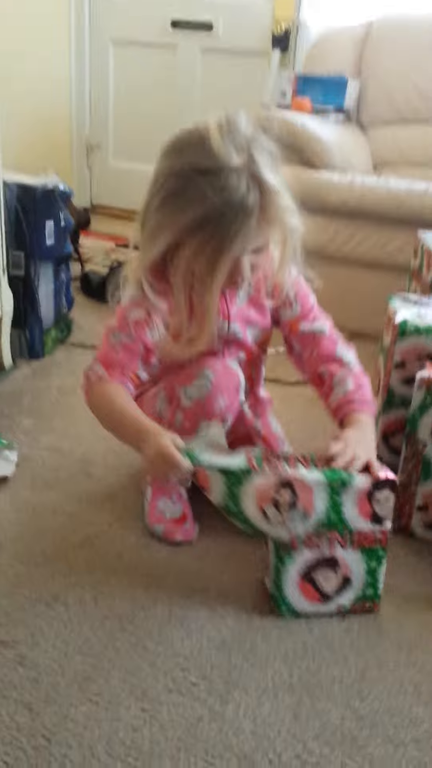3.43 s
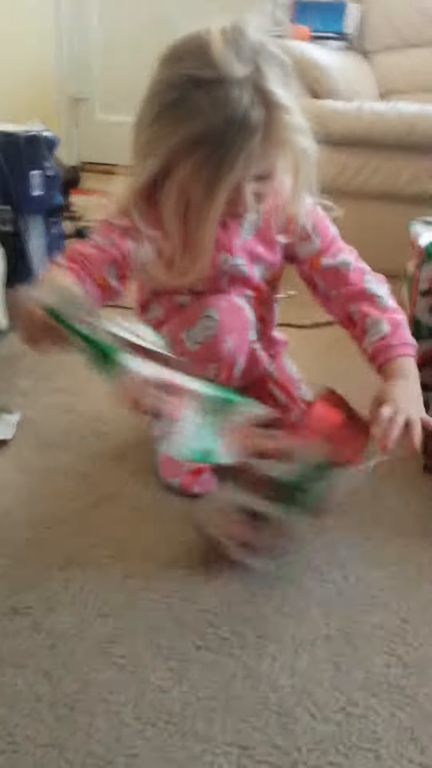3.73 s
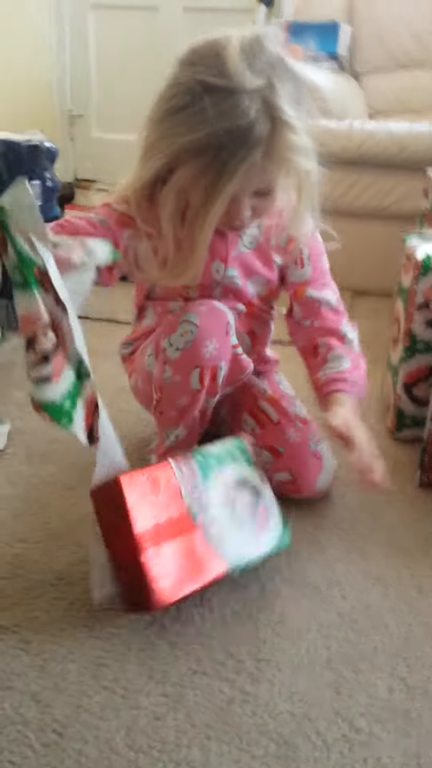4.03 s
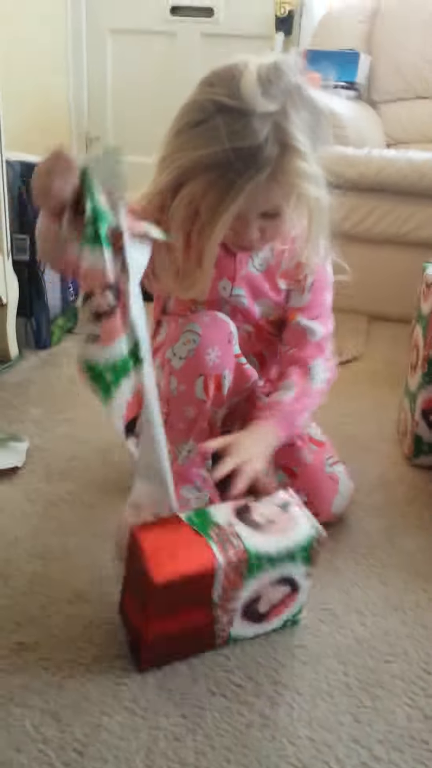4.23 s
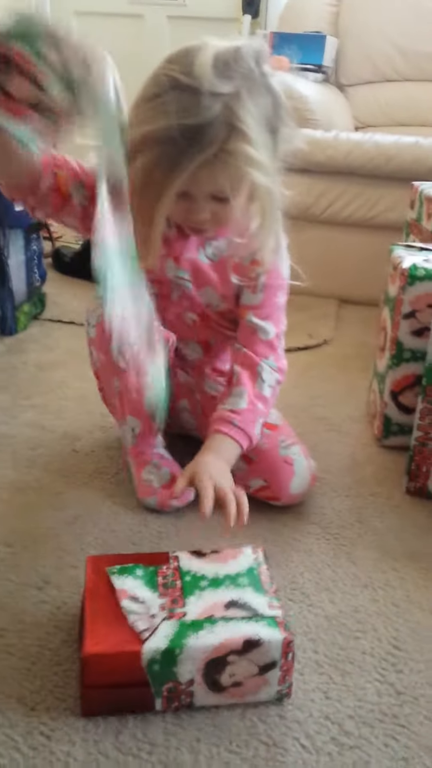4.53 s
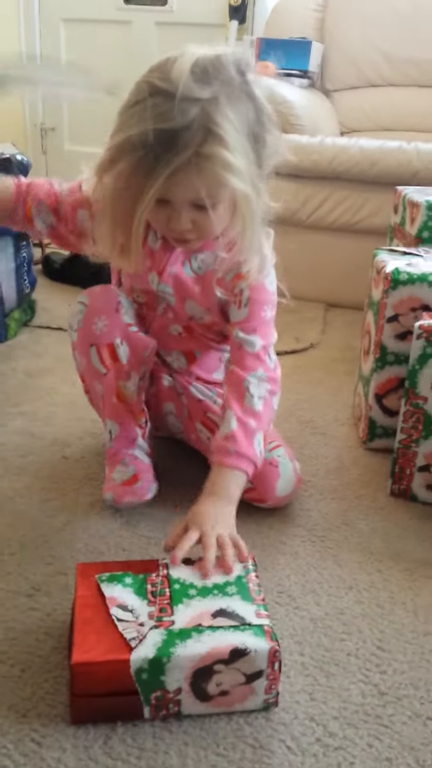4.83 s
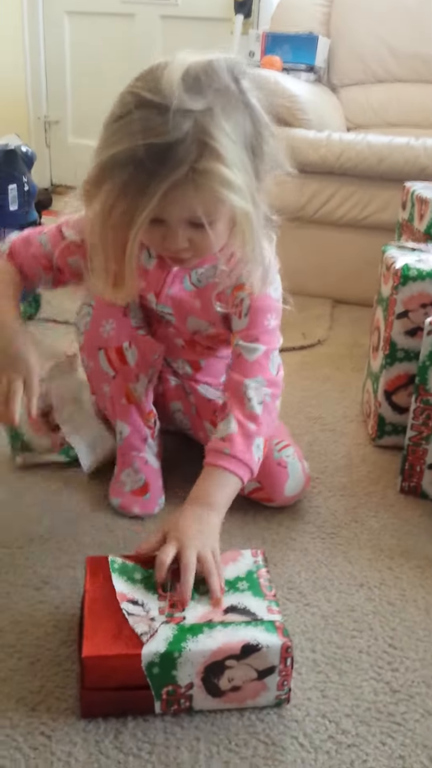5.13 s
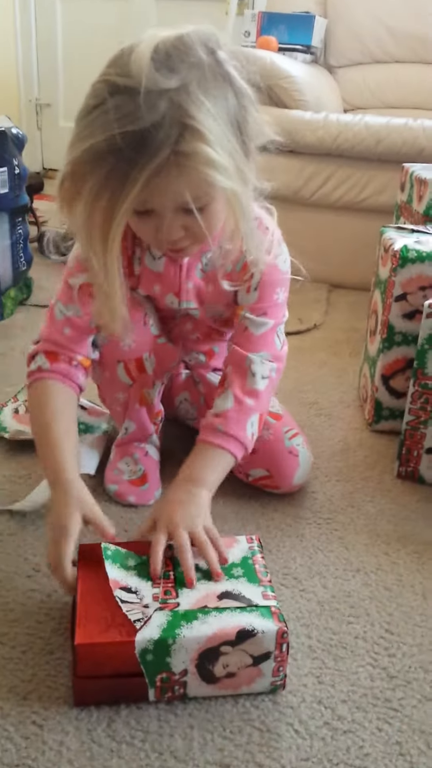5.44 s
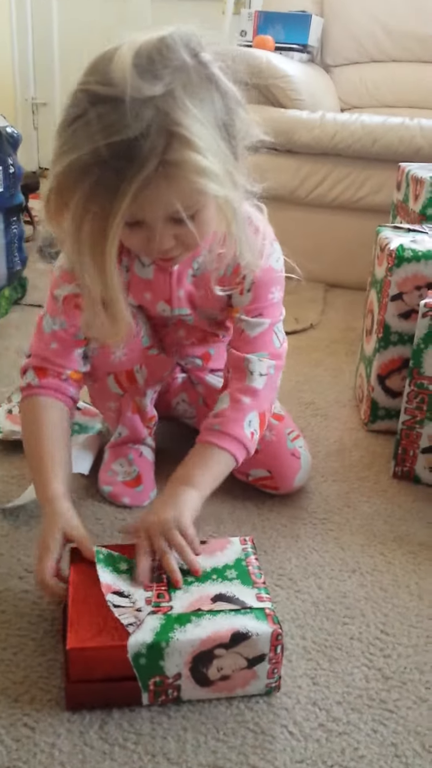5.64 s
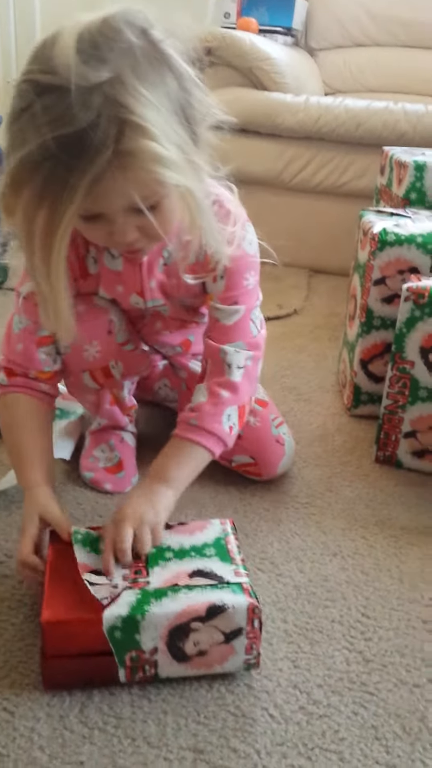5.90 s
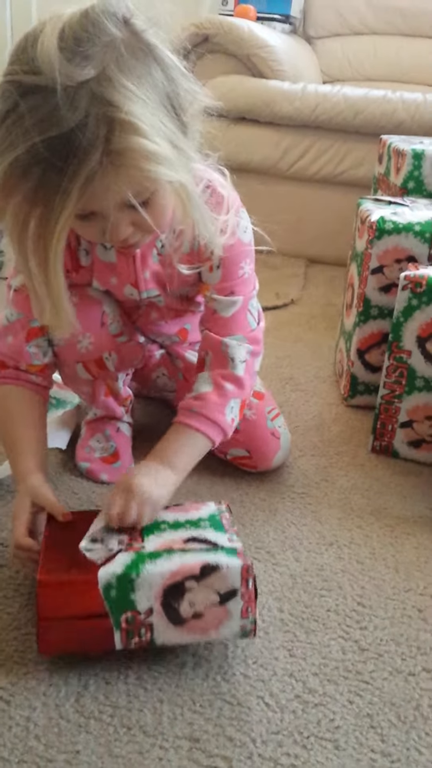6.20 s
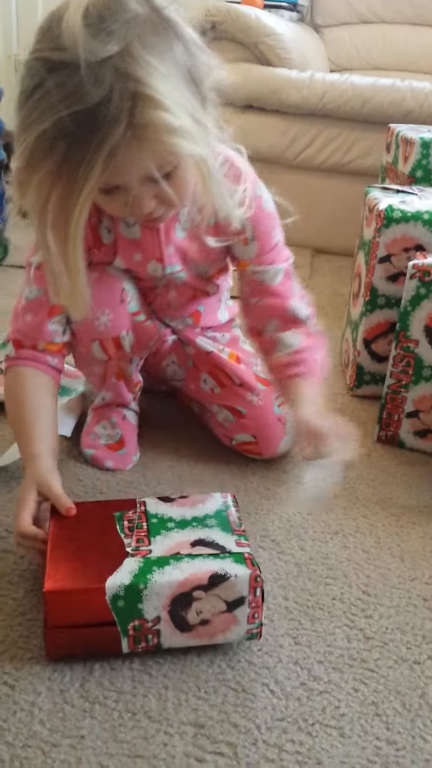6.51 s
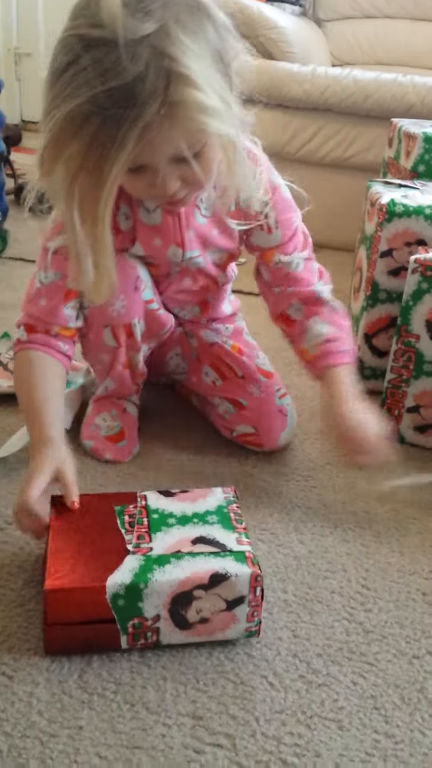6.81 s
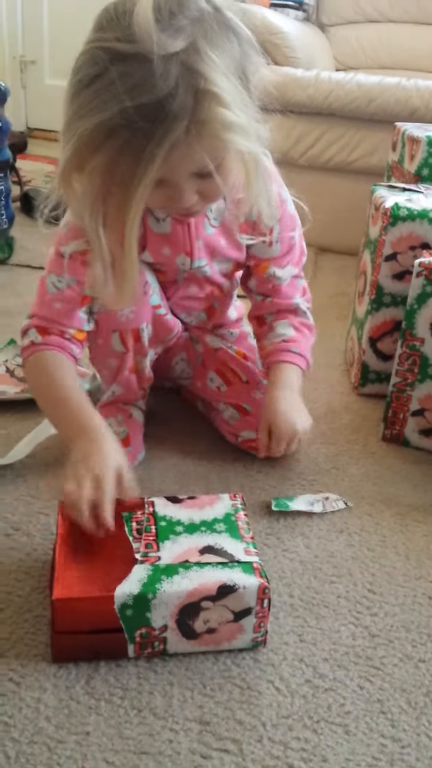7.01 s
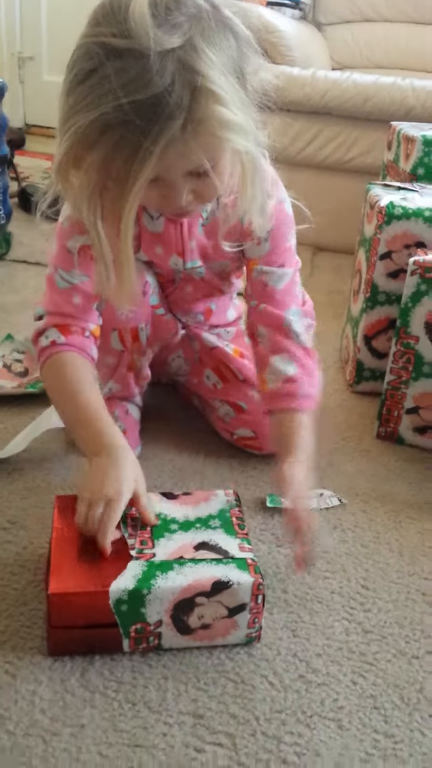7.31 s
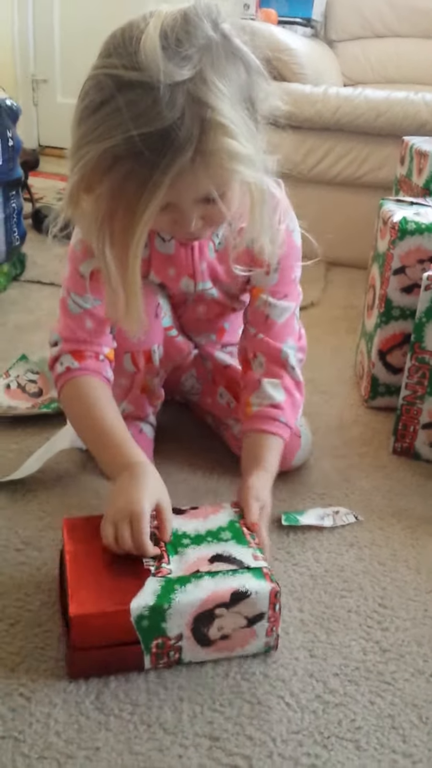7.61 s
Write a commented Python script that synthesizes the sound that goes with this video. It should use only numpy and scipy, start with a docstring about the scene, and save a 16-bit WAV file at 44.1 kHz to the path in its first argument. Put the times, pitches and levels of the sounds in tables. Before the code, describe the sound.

Hands rustle wrapping paper on a cardboard gift box, its creases snapping sharply, then tear it in a quick run of rips. After softer rustling comes a second, choppy run of rips with one dull pop on the right, then two more pulls. The box bumps lightly, the paper crinkles and rips once more, and faint handling follows. The sound is close, in a quiet living room with a faint appliance hum.

```python
'''A soft rustle of wrapping paper, dotted with snapping creases, as hands work at a box on a living-room carpet.
Then the paper rips, pull after pull: the edge gives with a snap, and a run of breaking fibres shakes
the sheet and drums the cardboard, swelling to a crest and easing off. Between pulls the rustle returns.
Hands knock the box, it tumbles over once, and one dull pop lands on the right.
The room answers with a short reverb over a faint appliance hum.'''
import sys
import numpy as np
from scipy import signal
from scipy.fft import rfft, irfft
from scipy.io import wavfile
from scipy.ndimage import uniform_filter1d

SR = 44100
rng = np.random.default_rng(int(sys.argv[2]) if len(sys.argv) > 2 else 0)


def waveform_to_disk(signal):
    """Save audio, clipped to [-1, 1], as 16-bit WAV at the path in sys.argv[1]."""
    frames = np.transpose(np.atleast_2d(signal))
    scaled = np.clip(frames, -1, 1) * 32767
    samples = np.round(scaled).astype(np.int16)
    wavfile.write(sys.argv[1], SR, samples)


N = 342216

# Cue levels are set ahead of each voice's trims. Boom, fizz and drum ride relative to the level;
# the crest sits at 0-1 of the move, and the sag is the drop away from it.
# tearing pulls: t/s, length/s, level/dB, crest, sag/dB, boom/dB, fizz/dB, box drum/dB, edge snap/dB
PULLS = [ (1.371, 0.084, -23.5, 1, 1.5, -7, -2, -16, -6.5),
         (1.455, 0.059, -15.5, 0.75, 3.5, -11, -3.5, -18.5, -13),
         (1.505, .168, -15.5, 0.3, 5, -13, -3.5, -24, 4),
         (1.887, .17, -20.5, 0.53, 4, -13.5, -4.5, -17, -0.5),
         (2.061, 0.073, -20, 0.6, 1.5, -11, -3, -17, -2), (3.184, .073, -16, 0.53, 8, -15, -5, -13, -3.5),
         (3.254, 0.14, -21, 0.03, 2.5, -14, -3, -16.5, -18),
         (3.41, 0.053, -19.5, 0.35, 1.5, -14, -0.5, -15.5, -3), (3.474, 0.033, -25, .1, 7, -14, 0, -8, 2),
         (3.603, 0.031, -20, .1, 16, -14.5, -9, -18, 0), (3.633, 0.049, -15.5, 0.4, 4, -21, -8, -17, -5),
         (3.683, 0.039, -20, 0.2, 4, -24, 0.5, -19, -7), (3.767, .060, -20.5, 1, 5, -14.5, -2.5, -23, -1),
         (3.826, 0.028, -17.5, 0.64, 4.5, -20, 3, -45, -10),
         (3.91, 0.065, -18, 0.8, 1, -14, -1.5, -26, -13),
         (4.306, 0.13, -20, 0.22, 8, -15.5, -5.5, -21.5, -8),
         (4.446, 0.13, -16.5, 0.05, 8.5, -17.5, -4, -20.5, 1.5),
         (6.316, 0.16, -21, .55, 4, -15.5, -1.5, -12, -6)]
# hand moves that rustle the paper: t/s, length/s, level/dB, crest, sag/dB, boom/dB, fizz/dB
HAND_MOVES = [ (0, 0.55, -44.5, .6, 3.5, -7.5, -4), (0.491, 0.25, -40, 0.33, -3, -7, -6.5),
              (0.715, .19, -29, 0.2, 3.5, -9, -4.5), (0.903, .15, -29, 0.6, 0.5, -11.5, -4.5),
              (1.051, 0.21, -22.5, 1, 6, -9.5, -4), (1.257, 0.074, -28, 0.56, 12, -9, -6),
              (1.335, .034, -24.5, 0, 1, -7.5, -15), (1.68, 0.19, -37.5, .3, 2, -8, -3.5),
              (1.855, 0.048, -24.5, .9, 3, -16.5, 0), (2.134, 0.069, -39, 0, 9, -5, 3),
              (2.23, 0.18, -44.5, 0.8, 6, -4.5, -6), (2.38, 0.19, -40.5, 0.5, 11, -4, -8),
              (2.558, 0.48, -45.5, 1, 8.5, -5.5, -4.5), (2.966, 0.17, -46, .6, -2, -5, -5),
              (3.12, 0.068, -25.5, .95, 10.5, -6.5, -9), (3.503, 0.12, -26.5, 0.8, 9.5, -10, -2.5),
              (3.859, 0.044, -28.5, 0.5, 2, -15, -14), (3.981, 0.34, -44, 0, 9, -4.5, -8),
              (4.279, .024, -27.5, .3, 4, -14, -8), (4.677, 0.26, -51, 1, 3, -6, -6),
              (4.89, .25, -43, 0.56, 6.5, -6.5, -6.5), (5.148, 0.074, -38.5, 0.1, 1, -6, 2),
              (5.223, .30, -47.5, .05, 3, -6, -6), (5.517, 0.38, -48.5, .25, 22, -7, -3),
              (5.897, 0.14, -46.5, 0.57, 14, -5, -4), (6.056, .12, -51, 0.9, 14, 1.5, 3),
              (6.175, .14, -25, .75, 7, -21.5, -4), (6.749, 0.063, -53, 0.8, 15, -16, -3),
              (6.827, 0.16, -51, 0.64, 11, -10, -3), (7.133, 0.29, -58.5, 0, 9, -1, -5),
              (7.445, 0.12, -39, 0.41, 25, -10, -8), (7.603, 0.15, -45.5, 1, 7, -7, 2.5)]
# large creases snapping through: t/s, level/dB, boom control/dB
CREASE_SNAPS = [(0.1399, -17.5, -40), (.2746, -18, -15), (0.5618, -11, -16), (.713, -1, -12),
                (.747, -8, -18), (.853, -7.5, -33), (0.9222, -10.5, -28), (0.9731, -0.5, -39),
                (1.051, -6, -30), (1.0847, -2, -30), (1.1173, -2, -19), (1.1266, -1, -9), (1.1763, -8, -28),
                (1.1903, -6, -26), (1.2103, -1, -39), (1.2418, -5, -24), (1.3385, -6, -19),
                (1.403, -1.5, -30), (1.4866, 1, -41), (1.8657, -5.5, -22), (2.1812, -14, -23),
                (2.2172, -18.5, -24), (2.3268, -20.5, -12), (2.7417, -24, -8), (2.766, -26, -30),
                (2.971, -14, -9), (3.057, -10.5, -4), (3.117, -9, -5), (3.145, -6, -8), (3.5538, -5, -44),
                (3.7553, -3, -15), (4.0482, -14.5, -2), (4.141, -15, -8), (4.2841, -12, -28),
                (4.8957, -20, -9), (5.0049, -12.5, -26), (5.079, -14.5, -30), (5.152, -13, -30),
                (5.1943, -13, -18), (6.0544, -17, -40), (6.0926, -13.5, -38), (6.148, -15, -21),
                (6.175, -6, -47), (6.2124, -10, -27), (6.2393, -1, -31), (6.2595, -8, -49),
                (6.275, -16, -42), (6.2957, -6.5, -38), (6.719, -33.5, 1), (7.5127, -19.5, -18),
                (7.6216, -24, -27), (7.668, -23, -26), (7.7094, -22.5, -30)]
# blows on the box and its taut wrapping: t/s, level/dB, favoured f/Hz
BOX_BLOWS = [(.714, -17.5, 2100), (0.721, -33, 324), (0.757, -33.5, 260), (1.047, -36, 220),
             (4.605, -31.5, 493), (4.616, -34, 66.5), (4.65, -51, 92), (4.733, -49, 460), (5.152, -38, 390),
             (5.33, -40, 367), (5.518, -34.5, 192), (5.575, -35, 327), (5.586, -35.5, 302),
             (5.967, -34, 403), (6.174, -31.5, 437), (7.136, -32.5, 320), (7.138, -45, 125),
             (7.496, -33.5, 367), (7.601, -41, 320)]
# modes of the wrapped cardboard box: nominal f/Hz, level/dB, t60/s
BOX_MODES = [(61.5, 3.5, 0.11), (119, 14, 0.14), (204.5, 3.5, 0.2), (312, -1, 0.077), (418.4, 3, 0.027),
             (466, -3.5, 0.13), (585, -6.5, 0.068), (910, -10.5, .04), (1230, -23, 0.0263),
             (1520, -13, 0.03), (1780, 0, 0.02), (2130, -4, 0.06), (2350, -8, 0.024)]
# tone of tearing paper: f/Hz, level/dB
TEAR_EQ = [(320, -41.5), (550, -18), (776, -8.5), (1010, -4.5), (1170, -10.5), (3150, -6.5), (4890, 1.5),
           (5540, -0.5), (6620, 3), (8250, -1), (12600, -9.5), (14700, -16.5)]
# tone of handled paper: f/Hz, level/dB
CRINKLE_EQ = [(88, -37.5), (150, -14.5), (208, -6), (323, -12.5), (399, -7), (696, -12.5), (1390, -11.5),
              (1500, -13), (3690, -6), (6570, 0), (10800, -8), (14700, -20)]
# tone of the quiet room: f/Hz, level/dB
ROOM_TONE_EQ = [(15, -46), (25, -19.5), (50, -5.5), (135, 5), (243, -6), (293, -3), (490, -10),
                (790, -15.5), (1670, -23.5), (7480, -20), (13800, -21.5), (15000, -16)]
# partials of the appliance hum: f/Hz, level/dB
HUM_PARTIALS = [(118.4, -68.5), (145.3, -63), (236.9, -67.5), (290.7, -60), (425.3, -73)]
# reverb decay of the living room: f/Hz, t60/s
ROOM_DECAY = [(200, 0.34), (1300, 0.37), (3500, 0.32), (7000, 0.24), (14000, 0.21)]
# reverb send, riding as the microphones move around the box: t/s, level/dB
REVERB_SEND = [(0, -10.5), (4.6, -5), (6.3, -9.5)]
# tilt between the microphones: f/Hz, left minus right level/dB
MIC_BALANCE = [(100, 2.5), (800, 0.5), (2400, 0.5), (3500, 2.), (5000, 3), (7000, 6.5), (8500, -6.5),
               (10400, -3.5), (14000, -2.5)]
# likeness of diffuse sound at the two microphones: f/Hz, correlation
MIC_LIKENESS = [(60, 0.92), (300, 0.8), (700, 0.45), (1500, 0), (4000, 0.18), (12000, 0.)]


def rip(level_db, boom_db, fizz_db, drum_db, fibres_per_s=2200, drum_trim_db=-5, low_cut_hz=160):
    """The tear runs in uneven slips; in each a bundle of fibres breaks and tugs at the box."""
    n = len(level_db)
    strain = stick_slip(n, per_s=210, slip_s=0.0026, spread_db=1.5, creep=0.42)
    fibres = crackle(strain, fibres_per_s, spread_db=1.5, ring_s=0.00038, flutter_db=1)
    grains = hollow(colour(fibres, TEAR_EQ))
    paper = sheet(grains, level_db, boom_db, fizz_db, trims_db=[-1.5, -.6, -.6], steady_s=0.024)
    drum = convolve(fibres, box_ring(favoured_hz=405, reach_octaves=0.68))
    drum = ride(drum, level_db + drum_db + drum_trim_db, steady_s=0.049)
    return signal.lfilter(*signal.butter(2, low_cut_hz, "high", fs=SR), paper + drum)


def rustle(level_db, boom_db, fizz_db, cracks_per_s=1000, slide_db=-10, buckling_db=-36):
    """Handled lightly the sheet slides and hisses; pressed harder its small creases buckle in clusters."""
    n = len(level_db)
    strain = stick_slip(n, per_s=97, slip_s=0.002, spread_db=4.0, creep=0.52)
    buckling = amp(1.23 * np.clip(level_db - buckling_db, -14, 0))
    ticks = unit_rms(crackle(strain, cracks_per_s, spread_db=3.5, ring_s=0.00046, flutter_db=-0.5))
    slide = amp(slide_db) * diffuse_noise(n)
    grains = colour(buckling * ticks + slide, CRINKLE_EQ)
    return sheet(grains, level_db, boom_db, fizz_db, trims_db=[-3, -2.5, -2.5], steady_s=0.059)


def snap(level_db, boom_db, usual_boom_db=-22, usual_share=0.12, trim_db=6):
    """A large crease flips and sets off smaller ones beside it; the wider the facet, the more boom."""
    t = np.arange(SR // 40) / SR
    first = crack(ring_s=.00035, flutter_db=-2, flutter_s=.0014, size=len(t))
    cascade = crackle(np.exp(-t / .004), per_s=2500, spread_db=2, ring_s=.0002, flutter_db=-3)
    click = colour(first + .55 * unit_rms(cascade), CRINKLE_EQ)
    # shelve the lows towards the wanted share of boom
    share = np.linalg.norm(registers(click)[0]) / np.linalg.norm(click)
    wanted_share = usual_share * amp(.5 * (boom_db - usual_boom_db))
    lows = signal.lfilter(*signal.butter(1, 2500, fs=SR), click)
    click = click + lows * (min(wanted_share / share, 3) - 1)
    return amp(level_db + trim_db) * click / np.sqrt((click ** 2).sum() / 2)


def stroke(length_s, crest_db, crest, sag_db):
    """One move of the hand: a level curve in dB that bends away from its crest on a parabola."""
    progress = np.arange(0, length_s, 1 / SR) / length_s
    return crest_db - sag_db * ((progress - crest) / max(crest, 1 - crest)) ** 2


def stick_slip(n, per_s, slip_s, spread_db, creep):
    """The strain lets go in sudden uneven bursts over a steady creep."""
    onsets = rng.random(n) < per_s / SR
    slips = onsets * amp(spread_db * np.minimum(rng.exponential(1, n), 3))
    bursts = signal.lfilter([1], [1, -np.exp(-1 / (slip_s * SR))], slips ** 2)
    return np.sqrt(creep + bursts)


def crackle(drive, per_s, spread_db, ring_s, flutter_db, facets_per_s=90, size=1024):
    """Random cracks of unequal size; as the paper moves new facets take over and the colour shifts."""
    n = len(drive)
    onsets = np.flatnonzero(rng.random(n) < per_s / SR)
    strength = amp(spread_db * np.minimum(rng.exponential(1, n), 3.5))
    wander = rng.standard_normal(n)
    facets = abs(onsets / SR * facets_per_s + wander[onsets]).astype(int)
    shapes = [crack(ring_s, flutter_db, flutter_s=0.003, size=size) for _ in range(facets.max() + 1)]
    out = np.zeros((2, n + size))
    for i, facet in zip(onsets, facets):
        out[:, i:i + size] += drive[i] * strength[i] * shapes[facet]
    return out[:, :n]


def crack(ring_s, flutter_db, flutter_s, size):
    """One facet of paper flips: a sharp attack at both microphones, then a brief flutter of the sheet."""
    t = np.arange(size) / SR
    attack = rng.standard_normal(size) * np.exp(-t / ring_s)
    # small offsets in time and level place it in the stereo image
    pair = np.array([np.pad(attack, (lag, 0))[:size] for lag in rng.integers(0, 5, 2)])
    pair *= amp(2 * rng.standard_normal((2, 1)))
    flutter = diffuse_noise(size) * np.exp(-t / flutter_s)
    return unit_rms(unit_rms(pair) + amp(flutter_db) * unit_rms(flutter))


def sheet(grains, level_db, boom_db, fizz_db, trims_db, steady_s):
    """The grains take on the strength of the move, with the boom and fizz of the sheet as it is held."""
    bands = registers(bending_waves(grains))
    levels = [level_db + boom_db, level_db, level_db + fizz_db]
    return sum(ride(band, db + trim, steady_s) for band, db, trim in zip(bands, levels, trims_db))


def bending_waves(x, ring_s=0.0019, lowest_hz=250):
    """Slow bending waves spread through the sheet, so its boom outlasts the crack."""
    impulse = signal.unit_impulse(SR // 60)
    for hz in np.geomspace(lowest_hz, 2500, 7):
        pole = np.exp(-1 / (ring_s * SR * np.sqrt(lowest_hz / hz)))
        feedback = [1, -2 * pole * np.cos(2 * np.pi * hz / SR), pole ** 2]
        impulse = signal.lfilter(feedback[::-1], feedback, impulse)  # all-pass: smears without colouring
    return convolve(x, impulse)


def hollow(x, dip_hz=790, scatter_octaves=0.28, q=3.7):
    """A narrow dip near 800 Hz, placed randomly per pull, makes the rip sound hollow."""
    hz = dip_hz * 2 ** (scatter_octaves * rng.uniform(-0.66, 1))
    return signal.lfilter(*signal.iirnotch(hz, q, fs=SR), x)


def registers(x):
    """Splits paper sound into boom, rasp and fizz."""
    bands = [(2500, "low"), ((2500, 8000), "band"), (8000, "high")]
    return [signal.sosfilt(signal.butter(3, hz, kind, fs=SR, output="sos"), x) for hz, kind in bands]


def knock(level_db, favoured_hz, scuff_db=-10.5, scuff_s=0.035):
    """A blow rings the box, with a scuff of cardboard."""
    ring = box_ring(favoured_hz, reach_octaves=0.42)
    t = np.arange(len(ring)) / SR
    band = signal.butter(2, [.5 * favoured_hz, 2 * favoured_hz], "band", fs=SR)
    scuff = unit_rms(signal.lfilter(*band, diffuse_noise(len(t)))) * np.exp(-t / scuff_s)
    return amp(level_db) * (ring + amp(scuff_db) * scuff)


def box_ring(favoured_hz, reach_octaves):
    """The modes of the box, detuned a little at each contact and weighted to the pitch it favours."""
    t = np.arange(SR // 4) / SR
    ring = 0
    for hz, db, t60 in BOX_MODES:
        weight = 1 / (1 + (np.log2(hz / favoured_hz) / reach_octaves) ** 4)
        tone = np.sin(2 * np.pi * hz * rng.uniform(0.928, 1.03) * t) * rng.choice([-1, 1])
        ring = ring + weight * amp(db - 60 * t / t60) * tone
    return ring / abs(ring).max()


def pop(level_db=1.5, swing_s=0.0021):
    """A single dull pop on the right only: a step that swings back through zero."""
    swing = np.arange(SR // 20) / SR / swing_s
    return np.outer([0, 1], amp(level_db) * (1 - swing) * np.exp(-swing * 0.91))


def reverb(x, moves_per_s=1.285, patterns=3):
    """The source moves about, so one pattern of echoes crossfades into the next."""
    t = np.arange(N) / SR
    send = x * amp(np.interp(t, *np.transpose(REVERB_SEND)))
    wet = 0
    for k in range(patterns):
        fade = np.cos(np.pi * (moves_per_s * t + k / patterns)) * np.sqrt(2 / patterns)
        wet = wet + convolve(send * fade, echoes()[:, :SR // 2])
    return wet


def echoes(predelay_s=0.0015, per_s=4000):
    """Dense echoes from furniture and walls, each band dying at its own speed."""
    taps = rng.standard_normal((2, SR)) * (rng.random((2, SR)) < per_s / SR)
    hz, t, bands = signal.stft(diffuse(taps), SR, nperseg=256)
    decay = amp(-60 * t / curve_at(ROOM_DECAY, hz)[:, None])
    tail = signal.istft(bands * decay, SR, nperseg=256)[1]
    tail *= np.clip(np.arange(tail.shape[1]) / SR / predelay_s - 1, 0, 1)
    return tail / np.linalg.norm(tail[0])


def room_tone(air_db=-53, hum_trim_db=-1, waver_hz=2.49):
    """A bed of room noise and the wavering hum of an appliance."""
    air = amp(air_db) * unit_rms(colour(diffuse_noise(N), ROOM_TONE_EQ))
    hum = 0
    for hz, db in HUM_PARTIALS:
        drift = waver_hz * unit_rms(uniform_filter1d(rng.standard_normal(N), SR // 12))
        phase = 2 * np.pi * np.cumsum(hz + drift) / SR
        hum = hum + amp(db + hum_trim_db) * np.sqrt(2) * np.sin(phase)
    return air + hum


def diffuse(x):
    """Two unrelated signals become alike in the bass, as at two close microphones."""
    left, other = rfft(x)
    likeness = np.clip(curve_at(MIC_LIKENESS, np.fft.rfftfreq(x.shape[1], 1 / SR)), -1, 1)
    right = likeness * left + np.sqrt(1 - likeness ** 2) * other
    return irfft(np.array([left, right]), x.shape[1])


def diffuse_noise(n):
    """White noise, centred in the bass and wide in the treble."""
    return diffuse(rng.standard_normal((2, n)))


def ride(x, level_db, steady_s):
    """Rides a stream of grains along a level curve, leaving its quick flicker."""
    power = uniform_filter1d((x ** 2).mean(0), int(steady_s * SR))
    edge_fades = signal.windows.tukey(len(level_db), min(0.00075 * SR / len(level_db), 1))
    return x / np.sqrt(abs(power) + 1e-12) * amp(level_db) * edge_fades


def colour(x, eq, size=2048):
    """Minimum-phase EQ, so that clicks keep their sharp attack."""
    hz = abs(np.fft.fftfreq(size, 1 / SR))
    log_gain = np.log(amp(curve_at(eq, hz)))
    taps = np.fft.ifft(np.exp(np.conj(signal.hilbert(log_gain)))).real
    return convolve(x, taps)


def curve_at(points, hz):
    """Breakpoints joined by straight lines on a log-frequency axis."""
    f, value = np.transpose(points)
    return np.interp(np.log(hz + 1), np.log(f), value)


def convolve(x, impulse):
    return signal.oaconvolve(x, np.atleast_2d(impulse), axes=1)[:, :x.shape[1]]


def amp(db):
    return 10 ** (np.asarray(db) / 20)


def unit_rms(x):
    return x / np.sqrt(np.mean(x ** 2) + 1e-20)


def add(bus, start_s, sound):
    part = bus[:, round(start_s * SR):][:, :sound.shape[1]]
    part += sound[:, :part.shape[1]]


def scene():
    """Paper, creases and box on three buses, each sent to the reverb, over the room tone."""
    paper, creases, box = np.zeros((3, 2, N))
    for t, length_s, level_db, crest, sag_db, boom_db, fizz_db, drum_db, edge_db in PULLS:
        add(creases, t, snap(edge_db, boom_db=-26))  # the edge gives way
        add(paper, t, rip(stroke(length_s, level_db, crest, sag_db), boom_db, fizz_db, drum_db))
    for t, length_s, level_db, crest, sag_db, boom_db, fizz_db in HAND_MOVES:
        add(paper, t, rustle(stroke(length_s, level_db, crest, sag_db), boom_db, fizz_db))
    for t, level_db, boom_db in CREASE_SNAPS:
        add(creases, t + .0006, snap(level_db, boom_db))
    for t, level_db, favoured_hz in BOX_BLOWS:
        add(box, t, knock(level_db, favoured_hz))
    mix = paper + creases + box + room_tone()
    mix += reverb(paper + amp(3.0) * creases + amp(-1.5) * box)
    add(mix, 3.6284, pop())
    return mix


def record(dry, high_cut_hz=14750):
    """Each microphone has its own colour; peaks clip at full scale and a steep high cut follows."""
    left = colour(dry[[0]], [(hz, db / 2) for hz, db in MIC_BALANCE])
    right = colour(dry[[1]], [(hz, -db / 2) for hz, db in MIC_BALANCE])
    clipped = np.clip(np.vstack([left, right]), -1, 1)
    high_cut = signal.firwin(401, high_cut_hz, window=("kaiser", 8), fs=SR)
    return signal.oaconvolve(clipped, high_cut[None], "same")


dry = scene()
out = record(dry)
waveform_to_disk(out)
```